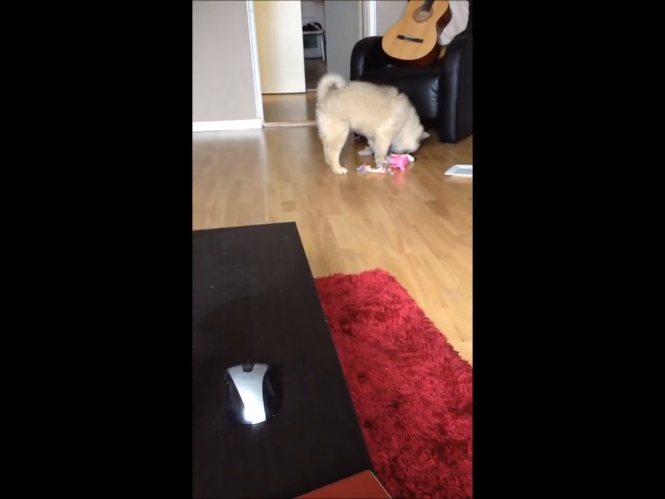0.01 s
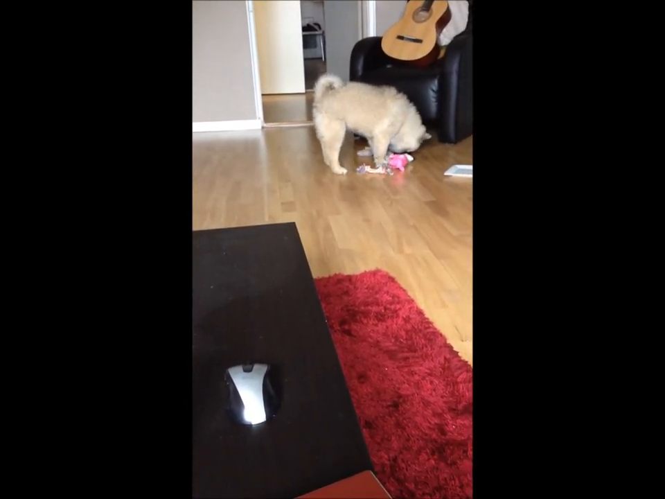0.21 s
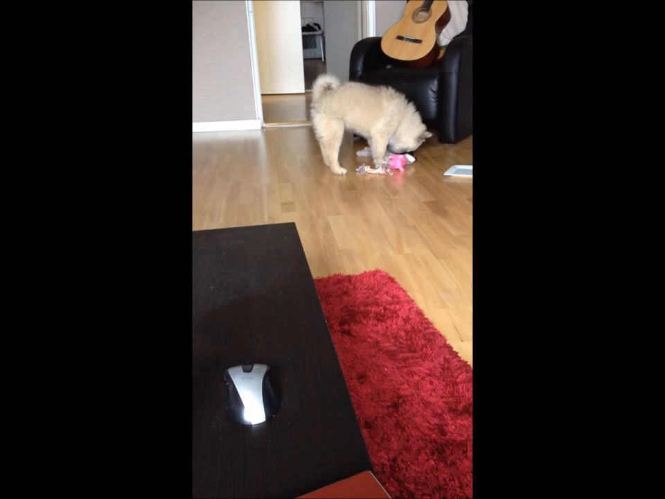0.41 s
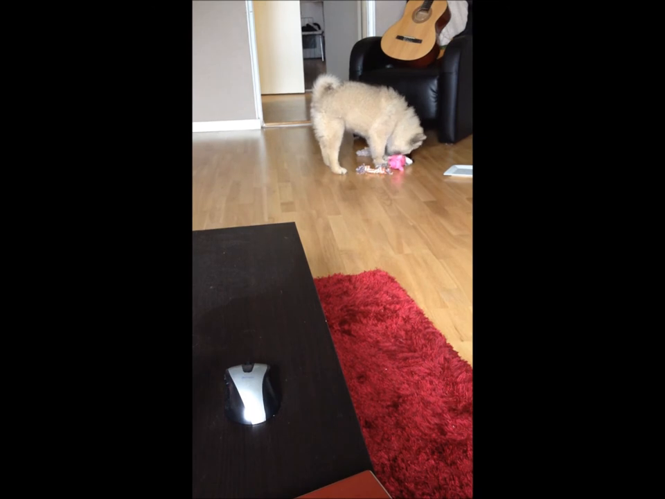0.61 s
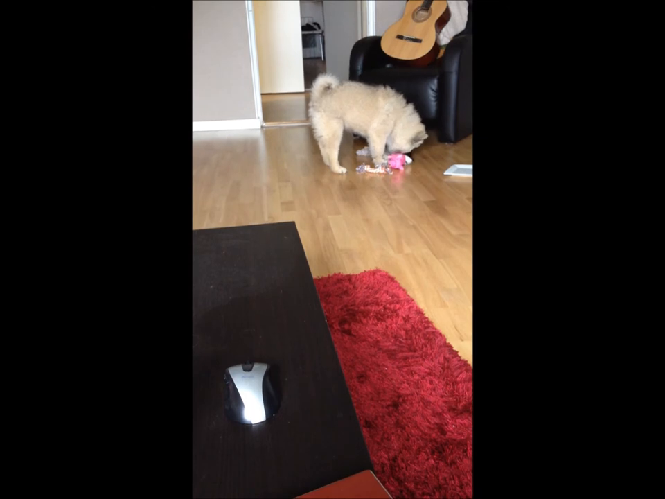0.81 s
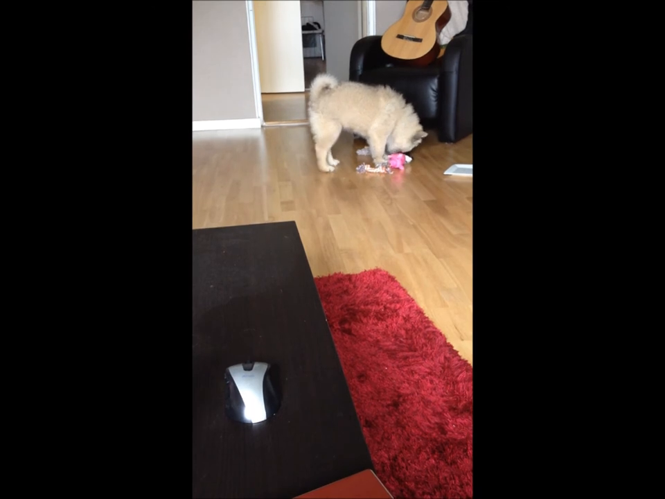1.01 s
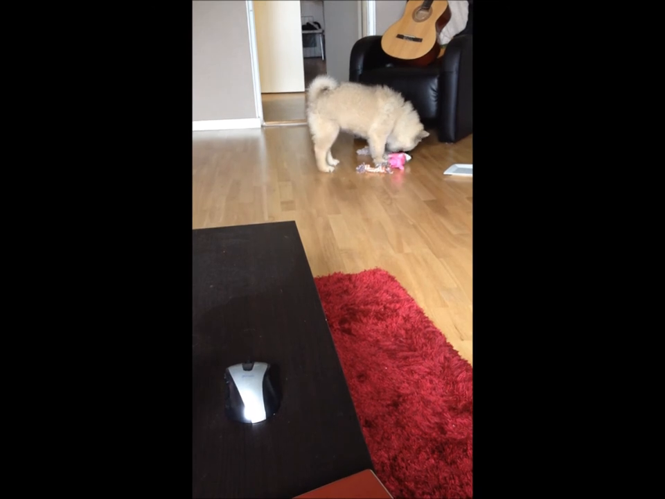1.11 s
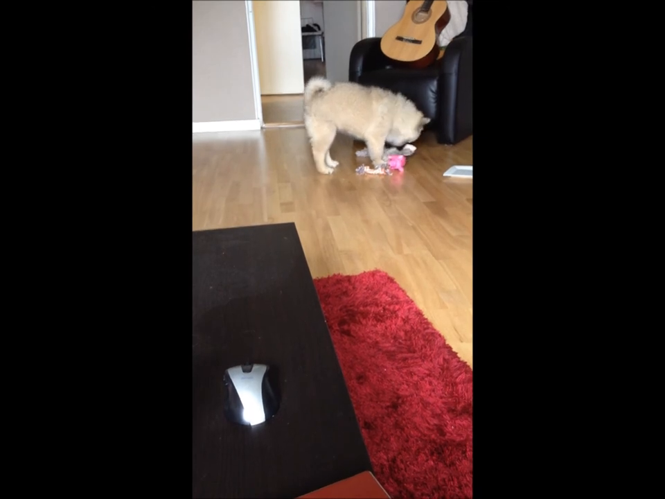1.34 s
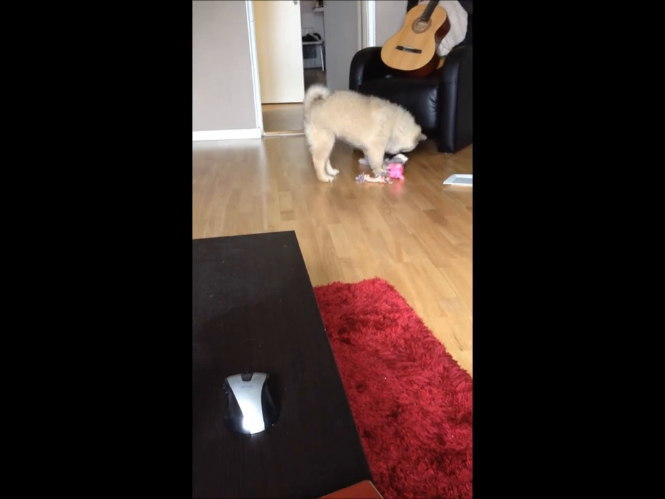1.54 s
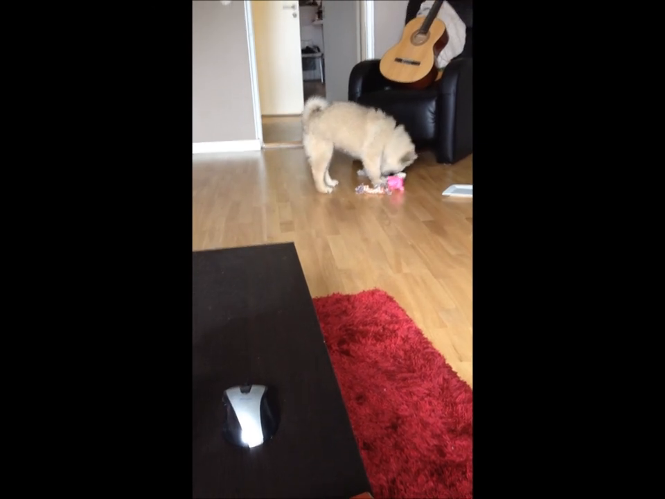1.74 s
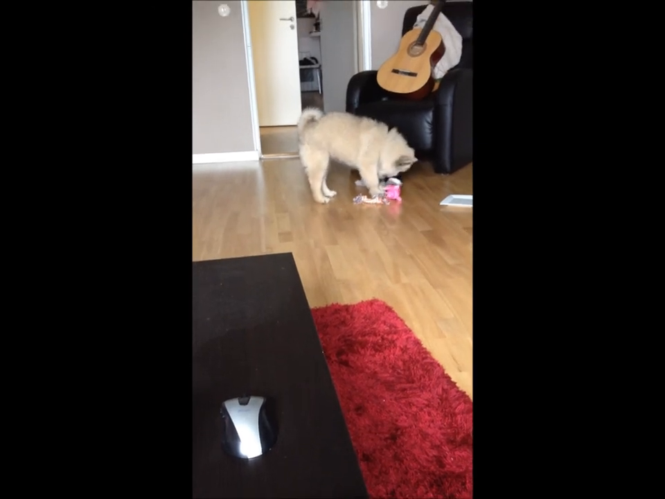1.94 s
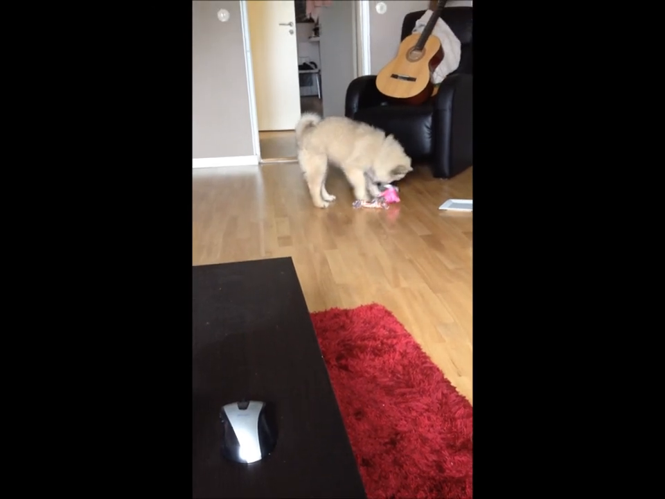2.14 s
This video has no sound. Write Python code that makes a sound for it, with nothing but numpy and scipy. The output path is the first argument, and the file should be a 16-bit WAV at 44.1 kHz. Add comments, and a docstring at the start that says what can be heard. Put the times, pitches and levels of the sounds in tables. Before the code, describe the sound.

Squeaky dog toy bitten repeatedly, sharp breaking squeaks answered by steadier, lower wheezing whistles in a room

```python
"""Shrill, rasping squeaks and softer, steadier whistles: a small dog chews a squeaky toy on the
wooden floor of a living room, a few metres away. Each bite drives air through the reed: its pitch
shoots up, breaks into a rasping overblown note and sags. As the jaws let go the toy refills with a
longer, steadier, lower squeak. Puffs of air and two very faint low swells, almost lost in the quiet
of the room, are added as shaped noise; the bare room rings after each squeak."""
import sys
import numpy as np
from scipy import signal
from scipy.fft import rfft, irfft, next_fast_len
from scipy.io import wavfile
from scipy.ndimage import uniform_filter1d

SR = 44100
rng = np.random.default_rng(int(sys.argv[2]) if len(sys.argv) > 2 else 0)


def to_wav(s):
    """Save 16-bit WAV."""
    ch = np.atleast_2d(s).T  # columns
    pcm = np.round(np.clip(ch, -1, 1) * 32767)  # PCM
    wavfile.write(sys.argv[1], SR, pcm.astype(np.int16))


N = 97020
LEAD = SR // 4  # samples of lead-in, so the room is already ringing
TIME = np.arange(-LEAD, N) / SR
TOP_HZ = 15400  # upper band limit of the reed's harmonics and of the microphone


def amp(db):
    """Decibels to gain."""
    return 10 ** (np.asarray(db) / 20)


def unit(x):
    """Scale to rms 1."""
    return x / np.sqrt(np.mean(x ** 2) + 1e-20)


def along(points, hz):
    """Read a curve of (f/Hz, value) points on a log frequency axis."""
    f, value = np.transpose(points)
    return np.interp(np.log(hz + 1), np.log(f + 1), value)


def filtered(x, response):
    """Multiply the spectrum of x by a response of frequency."""
    size = next_fast_len(len(x) + 8192)
    hz = np.fft.rfftfreq(size, 1 / SR)
    return irfft(rfft(x, size) * response(hz), size)[:len(x)]


def noise(colour):
    """White noise shaped by a colour curve, at rms 1."""
    white = rng.standard_normal(len(TIME))
    return unit(filtered(white, lambda hz: amp(along(colour, hz))))


def wobble(rate_hz):
    """A random curve of rms 1 whose movement falls away above this rate."""
    white = rng.standard_normal(len(TIME))
    return unit(filtered(white, lambda hz: 1 / (1 + (hz / rate_hz) ** 4)))


def room_tone():
    """The quiet of the room: steady, low-weighted noise."""
    # Colour of the quiet: [f/Hz, level/dB per Hz]
    hush_colour = [(25, -26), (60, -39), (120, -13), (195, 5.5), (300, -3), (600, -8), (1500, -9.5),
                   (5000, -13.5), (14000, -27.5)]
    return amp(-67.5) * noise(hush_colour)


def room(x, count=10):
    """Early bounces off floor and furniture, then a diffuse tail that favours no pitch and whose treble dies first."""
    # Reverberation time of the room: [f/Hz, T60/s]
    decay_times = [(150, 0.34), (1200, 0.51), (2400, 0.47), (5000, 0.51), (8000, 0.36), (14000, 0.28)]
    room_db, early_db = 3, -4
    wall_gap_s, early_s = .003, .02  # delay of the first bounce, spread of the early ones

    # noise that decays at its own rate in each band
    hz, t, bands = signal.stft(rng.standard_normal(SR * 3 // 4), SR, nperseg=256)
    decay = amp(-60 * t / along(decay_times, hz)[:, None])
    tail = signal.istft(bands * decay, SR, nperseg=256)[1]
    tail /= np.linalg.norm(tail)

    for when, size in rng.uniform(0, 1, (count, 2)):
        bounce = int(SR * (wall_gap_s + early_s * when))
        tail[bounce] += amp(early_db) * 2 * size / np.sqrt(count)

    # level the spectrum over 45 Hz (the bins are 1 Hz apart), so that no pitch is favoured
    spectrum = rfft(tail, SR)
    local_power = uniform_filter1d(abs(spectrum) ** 2, 45)
    tail = irfft(spectrum / np.sqrt(local_power))[:SR * 2 // 3]

    # silent until the wall gap has passed, then faded in over the same time
    tail *= np.clip(np.arange(len(tail)) / SR / wall_gap_s - 1, 0, 1)
    return amp(room_db) * signal.fftconvolve(x, tail)[:len(x)]


def bursts(rows, colour, rise_s, decay_s):
    """Soft, toneless bursts of noise: a straight rise up to the listed time, then an exponential decay."""
    level = np.zeros(len(TIME))
    for peak_s, db in rows:
        age = TIME - peak_s
        rise = np.clip(1 + age / rise_s, 0, 1)
        level += amp(db) * rise * np.exp(-np.maximum(age, 0) / decay_s)
    return level * noise(colour)


def faint_swells():
    """Two very faint, short swells of low noise, almost lost in the quiet of the room."""
    # Swells: [t/s, level/dB]
    swell_rows = [(.062, -65), (.49, -62.5)]
    # Colour of the swells: [f/Hz, level/dB per Hz]
    swell_colour = [(50, -29), (120, -1), (260, 2), (600, 2), (1500, -44), (6000, -53)]
    return bursts(swell_rows, swell_colour, rise_s=0.0045, decay_s=0.02)


def air_puffs():
    """Bites that push air out without sounding the reed: breathy noise."""
    # Puffs: [t/s, level/dB]
    puff_rows = [(.48, -59.5), (1.68, -45.5), (1.72, -55.5)]
    # Colour of the escaping air: [f/Hz, level/dB per Hz]
    puff_colour = [(60, -27), (130, -17), (230, -6.5), (500, -7), (1100, -11.5), (1550, -1.5), (1850, 6),
                   (2150, 0), (2600, -15), (5000, -18), (8000, -16.5), (14000, -43)]
    return bursts(puff_rows, puff_colour, rise_s=0.016, decay_s=0.023)


def reed(squeaks, bright_db, lift, colour, jitter, rough_jitter, jitter_hz, shimmer_db,
         leak_db, rush_db, overtone_db):
    """A beating reed: harmonics under a fixed colour; roughness shakes it, shifts its overtones and lets air rush."""
    # Air rushing through the overblown reed: [f/Hz, level/dB per Hz]
    rush_colour = [(60, -71), (180, -17.5), (500, -2.5), (1000, -3), (1700, -12.5), (2500, 1.5), (3600, 0),
                   (7200, 2), (9000, -4.5), (10500, -46), (14500, -27.5)]
    attack_s, release_s = 0.00084, 0.0055

    out = np.zeros(len(TIME))
    pitch_shake, level_shake = wobble(jitter_hz), wobble(jitter_hz)
    air, leak = noise(rush_colour), noise(colour)
    k = np.arange(1, 15)[:, None]  # harmonic numbers

    for rows, lift_db in zip(squeaks, bright_db):
        s, *columns = np.transpose(rows)
        on = (TIME > s[0]) & (TIME < s[-1] + release_s)
        t = TIME[on]
        hz, db, rough = (np.interp(t, s, column) for column in columns)
        rough = np.clip(rough, 0, 1)

        shaken_hz = hz * (1 + (jitter + rough_jitter * rough) * pitch_shake[on])
        phase = 2 * np.pi * np.cumsum(shaken_hz) / SR

        partial_db = along(colour, k * hz) + lift_db * along(lift, k * hz)
        partial_db += (k > 1) * overtone_db * rough
        audible = k * hz < TOP_HZ
        tone = np.sum(amp(partial_db) * audible * np.cos(k * phase), axis=0)
        tone *= amp(shimmer_db * rough * level_shake[on])

        # the air pulses with each swing of the reed
        breath = amp(leak_db) * leak[on] + amp(rush_db) * rough ** 2 * air[on]
        breath *= 1 + np.cos(phase) / 2

        attack = np.clip((t - s[0]) / attack_s, 0, 1)
        release = np.clip(1 - (t - s[-1]) / release_s, 0, 1)
        out[on] += attack * release * amp(db) * (tone + breath)

    # the squeaks carry little bass below about 200 Hz
    low_cut = signal.butter(2, 210, "highpass", fs=SR, output="sos")
    return signal.sosfilt(low_cut, out)


def refills():
    """The toy springs back and sucks air in through the reed: a cleaner whistle."""
    # One curve per refill: [t/s, pitch f/Hz, level/dB, flutter 0-1]
    refill_curves = [
        [(-.1, 1179, -41, 0), (-.03, 1201, -53.5, 0.01), (0, 1181, -43.5, 0.2)],
        [(.303, 1096, -49, 0.5), (.33, 1040, -55.5, 0.14), (.36, 988, -53, 0.3)],
        [(.364, 1159, -47, 0), (.378, 1164, -38.5, 0.1), (.392, 1204, -34, .1), (.42, 1179, -39.5, 0.13),
         (.472, 1163, -37.5, 0.08), (.484, 1244, -48, 0.73), (.505, 1239, -42.5, .8)],
        [(.799, 1138, -38.5, 0), (.818, 1121, -44.5, 0), (.835, 1134, -35.5, 0.14), (.848, 1204, -42, 0.3),
         (.868, 1154, -42.5, 0.12), (.885, 1126, -42, 0.2)],
        [(1.13, 1157, -42.5, 0), (1.158, 1219, -37.5, 0.31), (1.195, 1167, -42, 0.14),
         (1.225, 1149, -37.5, 0.08), (1.255, 1185, -41.5, 0.17), (1.29, 1116, -42.5, 0.2)],
        [(1.445, 1143, -40, 0.17), (1.475, 1162, -41, 0), (1.53, 1137, -39, 0.08), (1.555, 1174, -38.5, 0.3),
         (1.58, 1139, -44, 0.08), (1.6, 1115, -46.5, 0.2)],
        [(1.775, 1133, -47.5, .2), (1.795, 1079, -52.5, 0.3), (1.815, 1065, -60, 0.4), (1.835, 1038, -64, .3)],
        [(1.849, 1135, -42.5, 0.08), (1.878, 1184, -40, 0.08), (1.9, 1166, -40.5, 0.08), (1.92, 1122, -44, 0.2),
         (1.938, 1070, -52.5, 0.3)],
    ]
    # Brightness of each refill, as the muzzle covers more or less of the reed: [level/dB]
    refill_bright = [1, -7, -1.5, -0.5, 0, 2, -14.5, 0]
    # Share of that brightness at each frequency, sucking in: [f/Hz, share]
    in_lift = [(1200, -0.51), (3000, -0.19), (5500, -0.45), (8000, 0.86)]
    # Colour of the reed blown inward: [f/Hz, level/dB]
    in_colour = [(1000, -4.5), (1200, -0.5), (2350, -8), (3500, -12.5), (4700, -16.5), (5900, -22.5),
                 (7050, -4), (8150, -3), (9350, -14), (10500, -36.5), (12900, -32), (14200, -26.5),
                 (15500, -60)]
    return reed(refill_curves, refill_bright, in_lift, in_colour,
                jitter=.0015, rough_jitter=.022, jitter_hz=170,  # jitter as a share of the pitch
                shimmer_db=3, leak_db=-33, rush_db=-7, overtone_db=4)


def bites():
    """The jaws force air out through the reed: short, shrill, breaking squeaks."""
    # One curve per bite: [t/s, pitch f/Hz, level/dB, overblown 0-1]
    bite_curves = [
        [(.187, 1440, -34, 0.53), (.198, 1477, -35.5, 0), (.2, 1855, -33.5, 1), (.205, 1777, -29, 0.82),
         (.213, 1519, -34.5, 0.84), (.222, 1385, -35, 0.93)],
        [(.642, 1174, -38.5, 0.3), (.647, 1237, -41, 0.1), (.653, 1417, -32.5, 0.23), (.661, 1525, -32, 0.53),
         (.678, 1500, -37, 0.43), (.68, 1929, -30, 0.78), (.69, 1758, -26.5, 0.84), (.7, 1622, -36, 0.84),
         (.712, 1330, -34.5, 1)],
        [(.965, 1219, -33, 0), (.972, 1547, -35, 0.1), (.98, 1790, -27, 0.1), (.989, 1861, -26.5, 0.36),
         (.999, 1828, -24, 0.05), (1.001, 2022, -23.5, 0.38), (1.01, 1943, -29.5, 0.72),
         (1.026, 1842, -26, 0.47), (1.034, 1554, -29, 0.76), (1.044, 1407, -30, 0.62), (1.054, 1272, -36, 0.66)],
        [(1.332, 1474, -35, 0), (1.339, 1640, -35.5, 0.05), (1.352, 1754, -29, 0), (1.374, 1776, -29, 0.26),
         (1.377, 2013, -28, 0.58), (1.394, 1952, -27.5, 0.82), (1.407, 1799, -29.5, 0.82), (1.42, 1530, -38, 0)],
    ]
    # Brightness of each bite, as the muzzle covers more or less of the reed: [level/dB]
    bite_bright = [-0.5, -2, -1, 5.5]
    # Share of that brightness at each frequency, blowing out: [f/Hz, share]
    out_lift = [(1800, -0.61), (4500, 0.3), (7000, 0.41), (9000, 1)]
    # Colour of the reed blown outward: [f/Hz, level/dB]
    out_colour = [(700, -21), (1100, -10), (1500, -3), (2000, -1.5), (2450, -18), (3000, -7), (3700, -9),
                  (5500, -7), (7200, 0.5), (8800, -12.5), (10500, -34.5), (13500, -30.5), (15500, -48)]
    return reed(bite_curves, bite_bright, out_lift, out_colour,
                jitter=.007, rough_jitter=.014, jitter_hz=400,  # jitter as a share of the pitch
                shimmer_db=3, leak_db=-15.5, rush_db=-5, overtone_db=-2)


def scene():
    """The toy and the faint swells, their echo and the quiet of the room, with the lead-in cut off."""
    play = faint_swells() + air_puffs() + refills() + bites()
    mix = room_tone() + room(play) + play
    return mix[None, LEAD:]


def record(dry):
    """The microphone keeps nothing above its band limit."""
    return np.array([filtered(dry[0], lambda hz: hz < TOP_HZ)])


dry = scene()
out = record(dry)
to_wav(out)
```